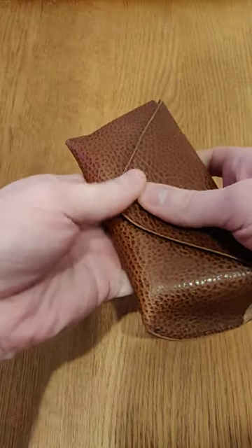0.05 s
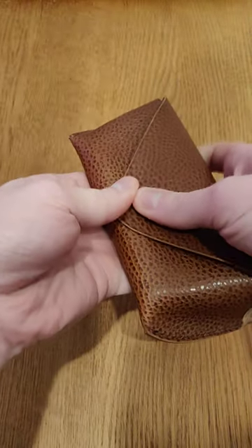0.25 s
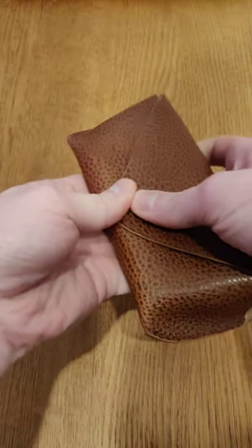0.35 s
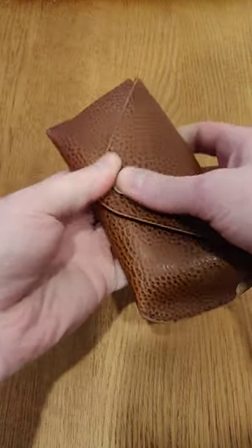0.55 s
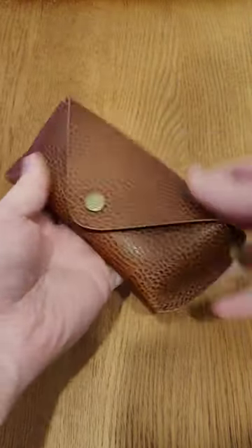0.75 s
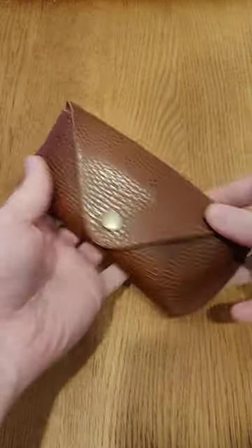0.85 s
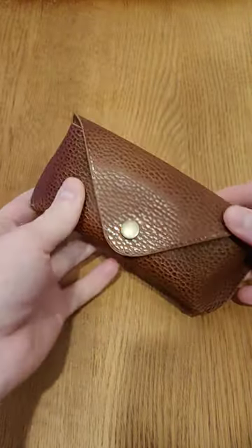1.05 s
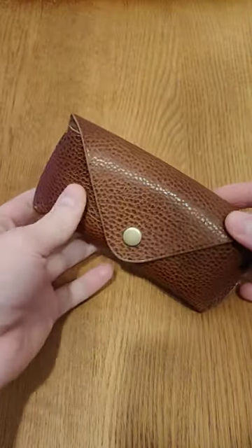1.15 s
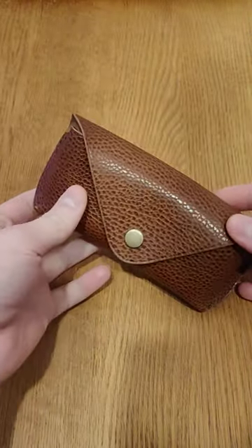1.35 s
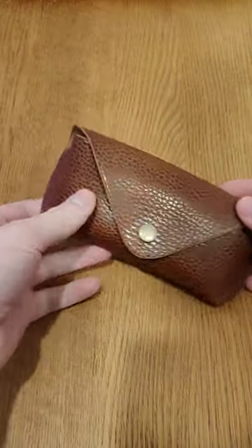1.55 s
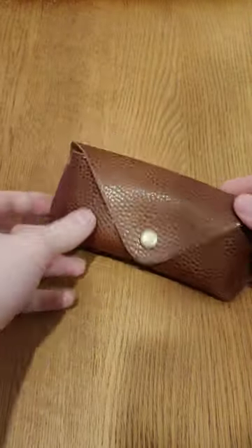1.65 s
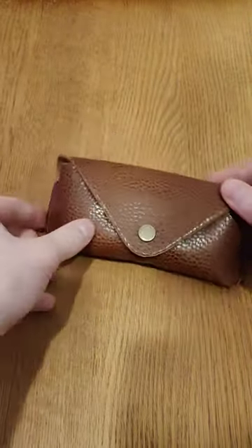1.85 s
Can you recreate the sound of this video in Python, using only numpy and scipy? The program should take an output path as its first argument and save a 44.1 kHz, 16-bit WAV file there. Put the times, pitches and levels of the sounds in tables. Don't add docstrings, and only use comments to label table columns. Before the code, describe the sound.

Metal snap fastener pressed closed on a leather case, double click, then faint finger handling

```python
import sys
import numpy as np
from scipy import signal
from scipy.fft import rfft, irfft, next_fast_len
from scipy.io import wavfile
from scipy.ndimage import uniform_filter1d, minimum_filter1d

SR = 44100
rng = np.random.default_rng(int(sys.argv[2]) if len(sys.argv) > 2 else 0)


def boost(x):
    u = np.asarray(x, float) / 20
    return 10 ** u


def file_out(sig):
    cols = np.atleast_2d(sig).T
    lim = np.clip(cols, -1, 1)
    pcm = np.round(lim * 32767).astype(np.int16)
    wavfile.write(sys.argv[1], SR, pcm)


N = 83790

# pitch_hz, level_db (per Hz)
FLOOR_COLOUR = [(20, 3), (60, -11), (130, -8.5), (300, -15), (900, -23.5), (5500, -24.5), (8500, -33.5),
                (15500, -35)]
# pitch_hz, likeness (-1 to 1)
FLOOR_LIKENESS = [(60, 0.51), (380, 0.47), (2380, -0.36), (15000, 0.14)]
# pitch_hz, t60_s
ROOM_DECAY = [(250, 0.27), (700, 0.34), (2200, 0.43), (5500, 0.32), (9000, 0.25), (15000, 0.16)]
# pitch_hz, level_db
ROOM_COLOUR = [(150, -7), (700, 3), (1400, -6), (3000, -2.5), (5500, 2), (8000, -4), (10000, -7),
               (15000, -1.5)]
# delay_s, level_db (over the tail)
WALL_ECHOES = [(0.021, -6.5), (0.053, -3.5)]
# delay_s, level_db
WALL_BOOMS = [(.014, -8), (.021, -13), (.039, -18), (.051, -12.5), (.071, -36), (.085, -18.5)]
# pitch_hz, left_minus_right_db
PORT_COLOUR = [(100, 4.5), (280, -7), (700, 8.5), (1400, 1), (3000, -1), (5500, 24), (7500, -14.5),
               (12000, -3)]
# pitch_hz, width_hz, level_db
CASE_MODES = [(280, 43, -14), (380, 22, -32.5), (695, 78, -2), (762, 183, -2.5), (942, 160, -5),
              (1503, 110, -10), (2230, 790, 0), (3460, 1200, 2), (6230, 780, -1.5), (7450, 2400, -12.5)]
# peak_s, rise_s, fall_s, level_db, brightness_db
SKIN_RUBS = [(0.036, 0.086, 0.015, -57.5, 1.5), (.16, .05, 0.15, -60.5, -5.5),
             (.45, 0.039, 0.051, -45.5, -5), (.64, 0.037, 0.056, -64.5, 12),
             (0.802, 0.073, 0.016, -60, 0.5), (0.864, 0.0035, 0.022, -50, -9.5),
             (1.041, 0.036, 0.018, -52.5, 3.5), (1.17, 0.018, 0.032, -68, 6.5),
             (1.69, 0.017, 0.028, -50.5, -14), (1.697, 0.03, 0.044, -62.5, 20.5),
             (1.801, 0.06, 0.23, -71, 4.5), (1.88, 0.015, 0.017, -56.5, -26)]
# start_s, peak_db, pitch_hz, width_hz
PAD_BUMPS = [(.029, -52, 720, 81), (.040, -40.5, 1590, 480), (.053, -55, 750, 140), (.132, -54.5, 712, 73),
             (0.194, -50, 1250, 330), (.205, -44, 775, 190), (.6162, -41, 380, 130), (.6162, -43, 670, 200),
             (.6265, -51, 690, 270), (.778, -46.5, 683, 94), (0.863, -44, 930, 295), (.869, -51, 784, 57),
             (.882, -43.5, 400, 160), (.890, -49, 686, 190), (0.921, -42, 300, 180),
             (1.68, -53.5, 1080, 250), (1.684, -37, 1050, 330), (1.693, -42.5, 700, 290),
             (1.6985, -43.5, 780, 202), (1.704, -57, 900, 200), (1.716, -47.5, 720, 130),
             (1.745, -54, 750, 150), (1.0385, -40, 744, 150), (1.095, -48.5, 695, 75),
             (1.815, -48, 706, 140), (1.875, -44, 687, 63), (0.877, -50, 193, 25.2), (.985, -53, 280, 49.6),
             (1.645, -53.5, 233, 36), (.030, -57.5, 257, 8), (.236, -35, 278, 34),
             (1.040, -53.5, 294.4, 28), (1.181, -58.5, 264, 20), (1.61, -56.5, 267, 32),
             (.862, -49.5, 522, 33)]
# start_s, peak_db, brightness_db, contact_s
FINGER_TAPS = [(0.042, -76, 18, 0.0011), (0.071, -47.5, 5, 0.0049), (0.141, -46.5, -7, 0.0016),
               (.194, -43.5, 0, 0.0011), (.297, -29, 11.5, 0.0019), (0.323, -35, 8, 0.002),
               (0.438, -31, 22, 0.0021), (.513, -31, 3, 0.0005), (.527, -31, 5, 0.00023),
               (.537, -38.5, 8.5, 0.00071), (.545, -36, 3, 0.00053), (.557, -39, 2, 0.00065),
               (.586, -41, 3, 0.00016), (0.621, -49, 5, 0.0016), (.630, -39, 6.5, 0.0012),
               (.693, -52, -3, 0.0019), (.738, -42.5, 1.5, 0.0014), (.781, -54, -2.5, 0.0013),
               (.819, -45, 6, 0.0013), (0.8613, -38.5, 9, .0025), (.871, -51, 7, 0.0014),
               (.877, -51, 13, 0.0026), (.895, -56, 15, 0.0048), (.953, -58, -33, 0.0024),
               (1.040, -43, -1.5, 0.001), (1.010, -54, 6, 0.002), (1.28, -57.5, -15, 0.0042),
               (1.549, -55.5, -3, 0.0034), (1.691, -52.5, 5, 0.0018), (1.699, -45.5, 6.5, 0.00083),
               (1.800, -53, 0.5, 0.0012), (1.873, -59, -9.5, 0.0011)]
# pitch_hz, width_hz, level_db
SIDE_MODES = [(240, 190, -12.5), (400, 97, -19.5), (924, 1200, -25.5), (1920, 1900, -20.5),
              (3900, 4000, -5.5), (6160, 2700, -20.5)]
SIDE_LEVELS = [-1, -4, -16]
# pitch_hz, width_hz, level_db
SEAT_MODES = [(315.6, 75, -9), (380, 49.4, -10), (697, 110, -15.5), (1065, 255, -6.5), (1698, 110, -11),
              (2140, 264, -7.5), (2490, 160, -10.5), (2945, 310, -11), (4300, 980, -7), (5470, 520, -5),
              (5830, 1300, -1), (7720, 720, -18), (12300, 3900, -25.5)]
# pitch_hz, width_hz, level_db
LOCK_MODES = [(328, 360, -23.5), (682, 69.5, -2), (784, 130, -4.5), (1086, 180, -9), (1520, 270, -8.5),
              (2281, 234, -5), (3060, 230, -8), (4410, 780, -3), (5550, 260, -8), (6750, 260, -11),
              (8490, 730, -25), (11100, 2200, -44.5), (14720, 640, -30.5), (16300, 1500, -33)]
# pitch_hz, width_hz, level_db
TICK_MODES = [(1770, 240, -5), (2410, 570, -6.5), (3900, 410, -2), (5500, 85, -13), (7000, 410, -9)]
# start_s, level_db, stage (0 seats, 1 locks, 2 ticks), brightness_db
STUD_SLIPS = [(.2265, -39.5, 0, -5.5), (.2276, 1.5, 0, -8), (.2286, -30.5, 0, 14), (.2292, 1.5, 0, 5),
              (.2306, -5.5, 0, -11), (.2313, -42, 0, -2.5), (.2323, -13.5, 0, 7), (0.2331, -14, 0, 4.5),
              (0.3512, -13, 2, -2.5), (0.3528, -16, 2, -1.5), (0.3545, -22.5, 2, -0.5),
              (.3727, -20.5, 1, -4.5), (.3735, 4, 1, 3.5), (.3743, -1, 1, 3.5), (.3752, -10.5, 1, 7),
              (.3762, -10, 1, 5.5), (.3772, -23.5, 1, 16), (.3782, -7.5, 1, 6)]
SWING_SIGN = [-1, -1, 1]
STAGE_PAN = [2, 0, 3]


def evened(x):
    return x / np.sqrt(np.mean(x ** 2) + 1e-20)


def read(points, hz):
    f, value = np.transpose(points)
    return np.interp(np.log(hz + 1), np.log(f + 1), value)


def add(mix, start_s, sound):
    part = mix[round(start_s * SR):][:len(sound)]
    part += sound[:len(part)]


def panned(left_minus_right_db):
    return boost([[left_minus_right_db / 2], [-left_minus_right_db / 2]])


def butter(sound, order, hz, kind="low"):
    return signal.sosfilt(signal.butter(order, hz, btype=kind, fs=SR, output="sos"), sound)


def ring(modes, brightness_db=0.0):
    t = np.arange(3000) / SR
    out = np.zeros(len(t))
    for k, (hz, width_hz, db) in enumerate(modes):
        lift_db = brightness_db * max(np.log2(hz / 700), 0) / 2
        onset = (1 - np.exp(-t * 5 * hz)) ** 2
        decay = np.exp(-np.pi * width_hz * t)
        out += (-1) ** k * boost(db + lift_db) * onset * decay * np.sin(2 * np.pi * hz * t)
    return out


def mains_hum():
    hum_hz, hum_db, waver_hz = 101.2, -67.5, 5.5
    t = np.arange(N) / SR
    r = np.exp(-np.pi * waver_hz / SR)
    waver = evened(signal.lfilter([1 - r], [1, -r], rng.standard_normal(N)))
    return boost(hum_db) * (1 + 0.11 * waver) * np.sin(2 * np.pi * hum_hz * t)


def room_floor():
    floor_db, patch_db, top_hz, pan_db = -60, 1.4, 16000, 1
    frames, hz = N // 512 + 5, np.fft.rfftfreq(2048, 1 / SR)
    a, b, c, d, patches = rng.standard_normal((frames, 1025, 5)).T
    patches = uniform_filter1d(patches, size=20, axis=0)
    patches = evened(uniform_filter1d(patches, size=6, axis=1))
    same = np.clip(read(FLOOR_LIKENESS, hz), -1, 1)[:, None]
    left = a + 1j * b
    right = same * left + np.sqrt(1 - same ** 2) * (c + 1j * d)
    colour = boost(read(FLOOR_COLOUR, hz)[:, None] + patch_db * patches) * (hz < top_hz)[:, None]
    noise = signal.istft(np.array([left, right]) * colour, nperseg=2048, noverlap=1536)[1][:, :N]
    return (boost(floor_db) * evened(noise) + mains_hum()) * panned(pan_db)


def room_answer(x):
    room_db, gap_s, pan_db = -6, 0.0033, 2
    late_db, late_t60_s = -24, 1.14
    lump_db, echo_width_s, mono_below_hz = 1.0, 0.0032, 500
    delay_s = np.arange(SR) / SR
    hits = np.zeros((2, SR))
    at = np.arange(20, SR - 20, 20) + rng.integers(0, 20, (2, (SR - 21) // 20))
    np.put_along_axis(hits, at, rng.choice([-1., 1.], at.shape), 1)
    hits = hits * boost(lump_db * evened(uniform_filter1d(rng.standard_normal(SR), size=90)))
    for echo_s, db in WALL_ECHOES:
        hits = hits * (1 + boost(db) * np.exp(-((delay_s - echo_s) / echo_width_s) ** 2))
    hz, t, z = signal.stft(hits, SR, nperseg=256)
    fade = boost(-60 * t / read(ROOM_DECAY, hz)[:, None]) + boost(late_db - 60 * t / late_t60_s)
    colour = boost(read(ROOM_COLOUR, hz))[:, None]
    tail = signal.istft(z * fade * colour, SR, nperseg=256)[1][:, :SR]
    low_pass = signal.butter(N=1, Wn=mono_below_hz, fs=SR, output="sos")
    low = signal.sosfiltfilt(low_pass, tail[0] - tail[1])
    tail = (tail + np.array([0 * low, low])) * panned(pan_db)
    tail = tail * np.clip(delay_s / gap_s, 0, 1) ** 2
    return boost(room_db) * signal.fftconvolve(x[None], tail / np.linalg.norm(tail[0]), axes=1)[:, :N]


def wall_booms(x):
    low = butter(x, 2, [539, 900], "band")
    out = np.zeros(N)
    for k, (delay_s, db) in enumerate(WALL_BOOMS):
        out += (-1) ** k * boost(db) * np.roll(low, round(delay_s * SR))
    return out


def microphone_ports(x):
    left_lead_s = 0.00009
    size = next_fast_len(N + 512)
    hz = np.fft.rfftfreq(size, 1 / SR)
    half = boost(read(PORT_COLOUR, hz) / 2) * np.exp(1j * np.pi * hz * left_lead_s)
    return irfft(rfft(x, size) * np.array([half, 1 / half]), size)[:, :N]


def skin_rubs():
    grains_per_s, grain_spread_db, hiss = 970, 2.5, 0.85
    t, out = np.arange(N) / SR, np.zeros(N)
    size = boost(grain_spread_db * np.minimum(rng.exponential(1, N), 5))
    grains = size * (rng.random(N) < grains_per_s / SR) * rng.choice([-1., 1.], N)
    drag = evened(grains) + hiss * rng.standard_normal(N)
    for peak_s, rise_s, fall_s, db, brightness_db in SKIN_RUBS:
        swell = np.exp(-np.maximum((peak_s - t) / rise_s, (t - peak_s) / fall_s))
        body = ring(CASE_MODES, brightness_db + 9.0)
        out += boost(db) * signal.oaconvolve(drag * swell, body / np.linalg.norm(body))[:N]
    return out


def pad_bumps():
    out, t = np.zeros(N), np.arange(2000) / SR
    for start_s, db, hz, width_hz in PAD_BUMPS:
        onset = 1 - np.exp(-t * 4 * hz)
        swing = onset * np.exp(-np.pi * width_hz * t) * np.sin(2 * np.pi * hz * t)
        add(out, start_s, -boost(db + 2.5) * swing)
    return out


def finger_taps():
    out, t = np.zeros(N), np.arange(800) / SR
    for start_s, db, brightness_db, contact_s in FINGER_TAPS:
        u = t / max(contact_s, 2e-4)
        contact = rng.standard_normal(800) * np.sqrt(u) * np.exp(-u)
        knock = np.convolve(contact, ring(CASE_MODES, brightness_db))
        add(out, start_s - 0.001, boost(db) * knock / abs(knock).max())
    return out


def sideways_crack():
    out = np.zeros(N)
    for start_s, db in zip((0.2295, 0.3742, 0.3516), SIDE_LEVELS):
        add(out, start_s, boost(db) * ring(SIDE_MODES))
    return out


def snap_stud():
    out = np.zeros((2, N))
    for start_s, db, stage, brightness_db in STUD_SLIPS:
        k = int(stage)
        modes = [SEAT_MODES, LOCK_MODES, TICK_MODES][k]
        blow = SWING_SIGN[k] * boost(db - 10) * ring(modes, brightness_db)
        for channel, sound in zip(out, blow * panned(STAGE_PAN[k])):
            add(channel, start_s, sound)
    return out


def scene():
    snap = snap_stud()
    hands = butter(finger_taps() + skin_rubs() + pad_bumps(), 6, 8600)
    near = butter(snap + hands, 2, 198, "high")
    wet = room_answer(near.mean(axis=0) + sideways_crack()) + wall_booms(snap.mean(axis=0))
    return microphone_ports(near) + wet + room_floor()


def top_cut(x):
    return signal.sosfilt(signal.butter(12, 17140, fs=SR, output="sos"), x)


def record(dry):
    ceiling, limit_s = 0.88, 0.0006
    sag_start_s, sag_end_s, sag_db, jump_s = 0.83, 0.860, -4.5, 0.0024
    t, span = np.arange(N) / SR, round(limit_s * SR)
    needed = np.minimum(ceiling / (abs(dry).max(axis=0) + 1e-9), 1)
    hold = minimum_filter1d(needed, 2 * span + 1)
    sag = np.clip((t - sag_start_s) / (sag_end_s - sag_start_s), 0, 1)
    sag = sag * np.clip((sag_end_s - t) / jump_s, 0, 1)
    level = uniform_filter1d(hold, span + 1) * boost(sag_db * sag)
    edge = signal.firwin(255, 17000, window=("kaiser", 9), fs=SR)[None]
    mix = signal.oaconvolve(dry * level, edge, "same")
    return top_cut(mix)


dry = scene()
out = record(dry)
file_out(out)
```